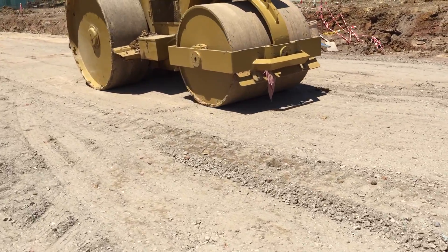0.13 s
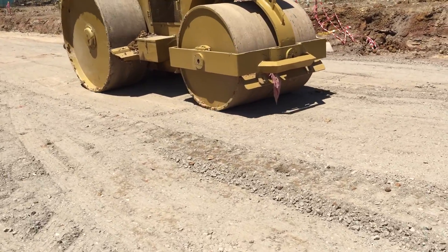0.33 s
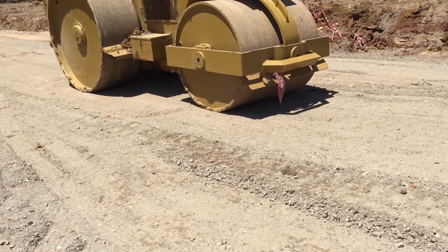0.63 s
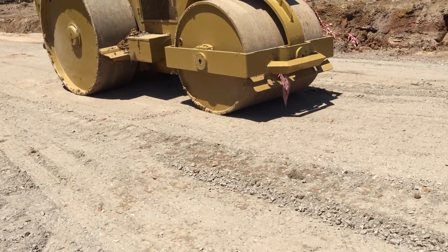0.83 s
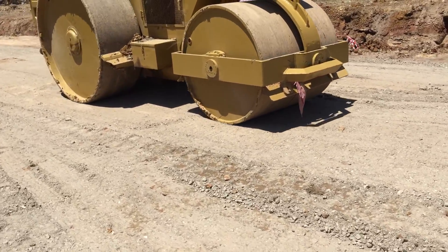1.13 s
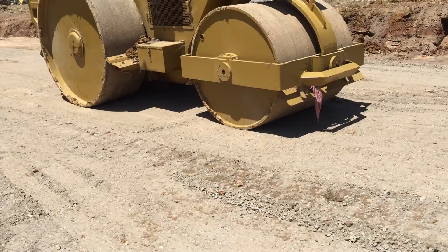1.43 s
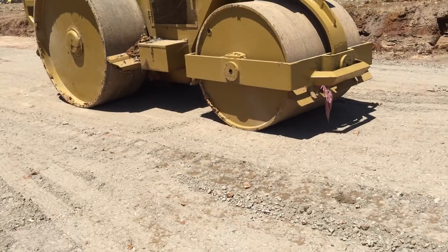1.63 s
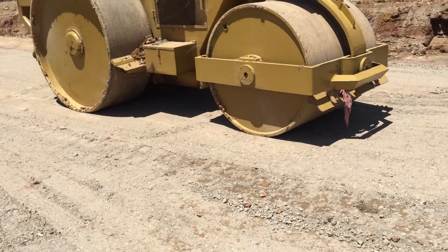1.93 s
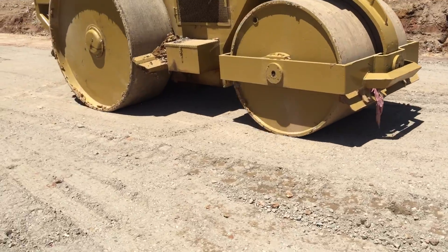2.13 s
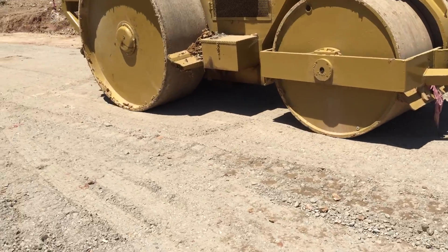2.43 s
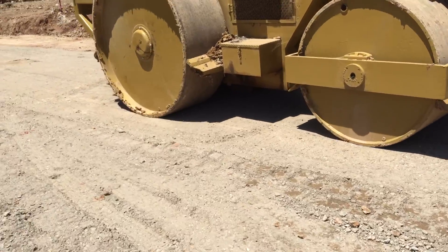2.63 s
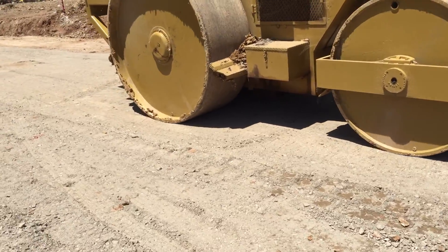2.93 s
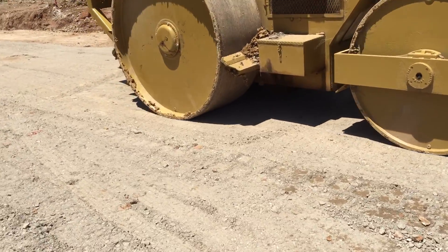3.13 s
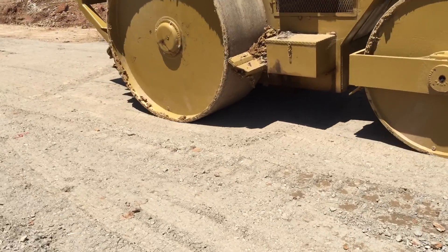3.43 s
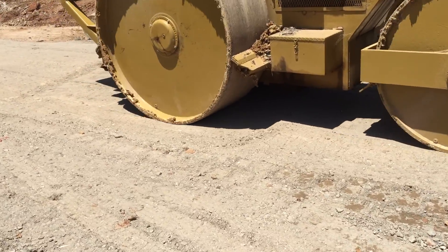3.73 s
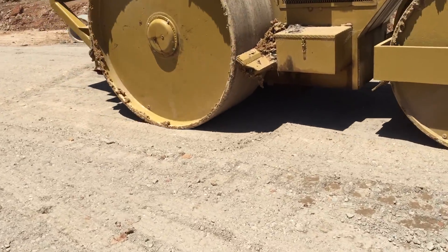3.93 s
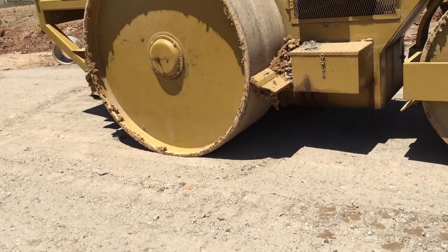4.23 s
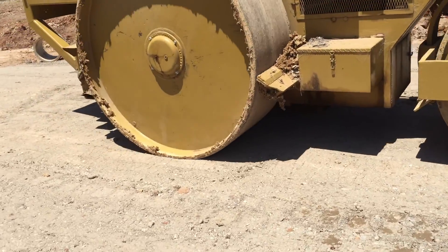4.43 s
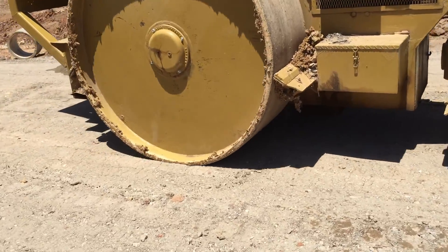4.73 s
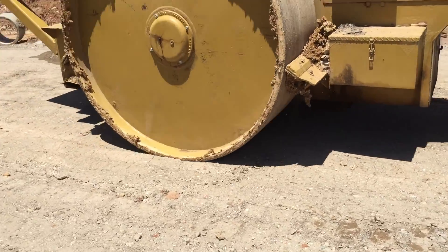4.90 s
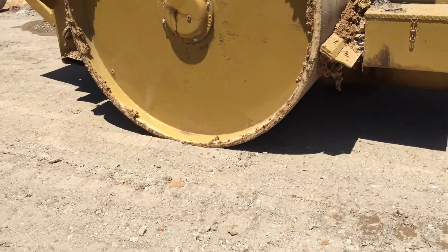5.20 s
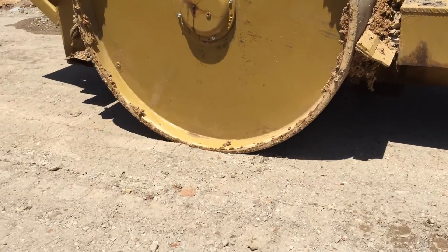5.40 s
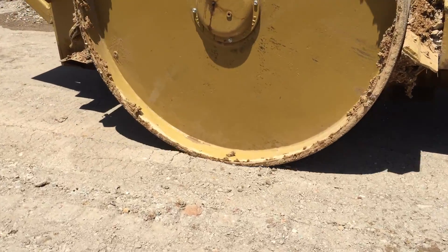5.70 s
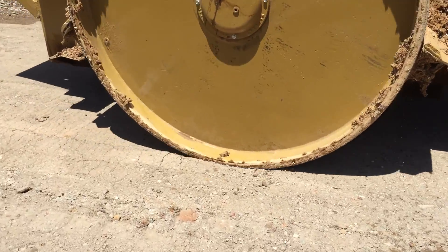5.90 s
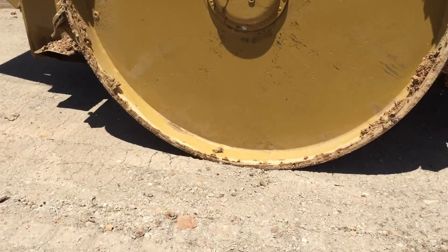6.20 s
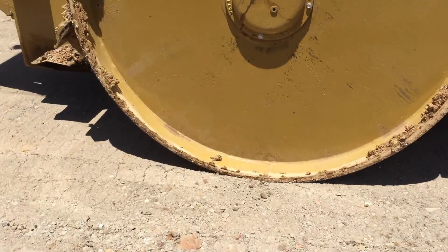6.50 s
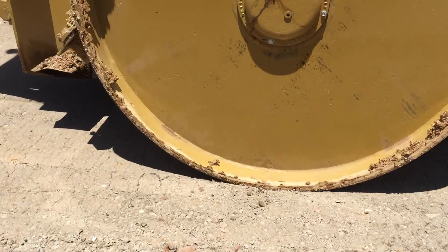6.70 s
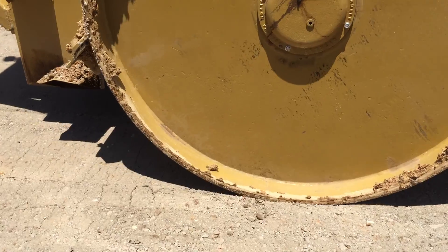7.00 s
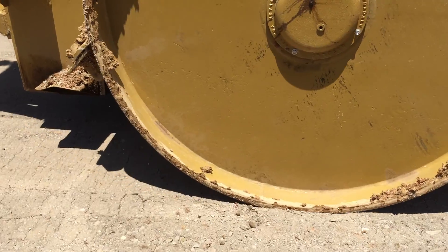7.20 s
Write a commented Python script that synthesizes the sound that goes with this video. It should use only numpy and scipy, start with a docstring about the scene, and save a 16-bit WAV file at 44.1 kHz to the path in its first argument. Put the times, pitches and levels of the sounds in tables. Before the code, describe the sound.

Outdoors on a construction site, a heavy diesel roller chugs at idle, its low rumble topped by a rattling rasp. The throttle opens and the knock turns hard for a moment before the engine steadies at a higher speed. A gear whine joins in, with fan noise behind it, and the sound swells as the roller draws within a couple of metres of the microphone.

```python
"""First comes the slow throb of a four-cylinder diesel: a road roller, about 6.5 m up the road.
At three seconds it is opened up, overshoots and settles, then rolls by about 2 m from the microphone.
Every firing throbs in the exhaust, booms in the hood and knocks in the block; the knock turns harsh
while the engine speeds up. Pump and gears whine on multiples of the firing rate, and behind
it all is the rush of the cooling fan."""
import sys
import numpy as np
from scipy.fft import rfft, irfft, next_fast_len
from scipy.io import wavfile
from scipy.ndimage import uniform_filter1d, map_coordinates

SR = 44100
rng = np.random.default_rng(int(sys.argv[2]) if len(sys.argv) > 2 else 0)


def master_out(mix):
    """Clip the mix to full scale and print it as 16-bit PCM to the path in sys.argv[1]."""
    frames = np.transpose(np.atleast_2d(mix))
    ceiling = np.clip(frames, -1, 1)
    pcm = np.round(ceiling * 32767).astype(np.int16)
    wavfile.write(sys.argv[1], SR, pcm)


N = 324135

# Level laws of exhaust harmonics 1 to 3: (idle level [dB], working level [dB],
# added by full fuel [dB], distance-loss factor [ratio], nearest the microphone at [s])
EXHAUST_LEVELS = [(-23, -17.5, 2.8, 0.22, 6.2), (-19.3, -26, 1, 0.66, 5.8), (-32, -32, 0, 1.12, 7.7)]

def exhaust(firing, throttle, burn):
    """The deep throb of the pipe; its two humps merge into one puff as the throttle opens."""
    first_db, second_db, third_db = [level(law, throttle, burn) for law in EXHAUST_LEVELS]
    lag_turns = 0.5 * (1 - throttle) - 0.06 * throttle
    first = amp(first_db + 0.1 * wobble(18)) * tone(firing)
    second = amp(second_db + 0.51 * wobble(25)) * tone(2 * firing - lag_turns)
    third = amp(third_db + 0.7 * wobble(15)) * tone(3 * firing - lag_turns)
    return first + second + third


# Knock of each cylinder, in firing order: (relative level [dB])
CYLINDER_KNOCK = [0.52, -0.75, 0.3, 0.13]
# The block's colour at idle and at working speed: (frequency [Hz], relative level [dB])
BLOCK_IDLE_SPECTRUM = [(250, -13), (420, -7.5), (560, -1), (680, 0), (820, -4), (1100, -1.5), (1300, -1.5),
                       (1480, -0.5), (1900, -4.5), (2150, -10), (2600, -11), (3400, -28), (6000, -48)]
BLOCK_WORK_SPECTRUM = [(250, -15), (420, -10), (600, -3), (760, 2), (880, -1.5), (1050, 1.5), (1280, -2),
                       (1600, 1.5), (1850, -1), (2100, -3.5), (2500, -5.5), (3400, -15.5), (6000, -41)]
# The block's level law, columns as for the exhaust
BLOCK_LAW = (-26, -26.5, 2.5, 0.92, 5.6)

def block_knock(firing, throttle, fuel):
    """Combustion knocks in the block, with a sharper attack at working speed."""
    idle_knocks = blows(firing, CYLINDER_KNOCK, lag=0.2, rise_s=0.006, decay_s=0.025,
                        repeat=0.43, scatter_db=0.86, jitter_s=5e-5)
    work_knocks = blows(firing, CYLINDER_KNOCK, lag=0.15, rise_s=0.0021, decay_s=0.032,
                        repeat=0.58, scatter_db=0.77, jitter_s=4e-5)
    idle = np.sqrt(1 - throttle) * coloured(idle_knocks, BLOCK_IDLE_SPECTRUM)
    work = np.sqrt(throttle) * coloured(work_knocks, BLOCK_WORK_SPECTRUM)
    return amp(level(BLOCK_LAW, throttle, fuel)) * (idle + work)


# Boom of each cylinder, in firing order: (relative level [dB])
CYLINDER_BOOM = [-0.4, 1.5, -0.99, 0.2]
# The hood's colour: (frequency [Hz], relative level [dB])
HOOD_SPECTRUM = [(8, -45), (25, -6), (60, 3), (130, -2.5), (160, -5), (195, 0.5), (270, -1.5), (330, -2.5),
                 (430, -6), (600, -21), (1000, -50)]
# The hood's level law, columns as for the exhaust
HOOD_LAW = (-33, -31.5, 7.5, 0.72, 6.1)

def hood_boom(firing, throttle, burn):
    """Each firing shakes a low thump out of the hood."""
    thumps = blows(firing, CYLINDER_BOOM, lag=0.2027, rise_s=0.002, decay_s=0.016,
                   repeat=0.44, scatter_db=1.5, jitter_s=1e-4)
    return amp(level(HOOD_LAW, throttle, burn)) * coloured(thumps, HOOD_SPECTRUM)


# Resonances of the steel covers: (frequency [Hz], width [Hz], relative level [dB])
COVER_MODES = [(1297, 55, 0.5), (1602, 133, -2.5), (1872, 70, -2.5), (1980, 66, -2.5), (2282, 62, -3),
               (2580, 98, -4.5), (3028, 48, -6.5), (3220, 60, -11), (3837, 36, -8.5), (4570, 41, -11.5),
               (6150, 250, -18.5)]
# The covers' level law, columns as for the exhaust
COVER_LAW = (-30.5, -31.5, 5, 1.1, 6.5)

def cover_ring(firing, throttle, fuel):
    """Each firing taps the steel covers and sets them ringing."""
    taps = blows(firing, CYLINDER_KNOCK, lag=0.1, rise_s=0.0011, decay_s=0.013,
                 repeat=0.36, scatter_db=2.5, jitter_s=4e-5)
    return amp(level(COVER_LAW, throttle, fuel)) * ringing(taps, COVER_MODES)


# The injectors' colour: (frequency [Hz], relative level [dB])
INJECTOR_SPECTRUM = [(1500, -18), (2500, 2), (3100, 1.5), (3900, 0.5), (4500, -1), (5000, -3), (5700, -1.5),
                     (6800, -2), (7700, -7.5), (9200, -7.5), (10500, -14), (11300, -12.5), (13000, -13),
                     (15400, -18.5)]
# The injectors' level law, columns as for the exhaust
INJECTOR_LAW = (-33.5, -33.5, 3, 1.13, 5.85)

def injector_rasp(firing, throttle, fuel):
    """One bright tick per firing runs together into a rasp."""
    ticks = blows(firing, CYLINDER_KNOCK, lag=0.06, rise_s=0.0036, decay_s=0.021,
                  repeat=0.43, scatter_db=0.7, jitter_s=3e-5)
    return amp(level(INJECTOR_LAW, throttle, fuel)) * coloured(ticks, INJECTOR_SPECTRUM)


# Colour of the knock under extra fuel: (frequency [Hz], relative level [dB])
HARSH_SPECTRUM = [(60, -30), (130, 0), (200, 19), (260, 20), (330, 13), (460, 14), (900, 6), (1300, 0),
                  (2000, 19), (2600, 5), (3400, 5), (5000, -3), (9000, -6), (12000, -8), (15400, -12)]
# The treble snap's level law, columns as for the exhaust
SNAP_LAW = (-50, -49, 6.5, 1.8, 3.5)

def combustion_crack(firing, throttle, fuel):
    """Extra fuel makes each knock harsh; the knock's sharp front carries a snap at the very top."""
    cracks = blows(firing, CYLINDER_KNOCK, lag=0.1, rise_s=0.0016, decay_s=0.0095,
                   repeat=0.23, scatter_db=4.0, jitter_s=1e-4)
    harsh = amp(-32.5) * np.maximum(fuel, 0) * coloured(cracks, HARSH_SPECTRUM)
    snap_spectrum = [(4000, -30), (8500, -4), (9700, 0), (10500, -11), (11800, -0.5), (15400, -9)]
    snap = amp(level(SNAP_LAW, throttle, fuel)) * coloured(cracks, snap_spectrum)
    return harsh + snap


# Lesser engine tones at idle and at working speed: (firing-rate multiple [ratio], relative level [dB])
IDLE_DRONE = [(1.75, -47), (2.75, -44), (4, -50.5), (4.5, -48.5), (5, -51), (6.25, -52), (12, -45),
              (13, -44), (14, -47.5), (14.5, -50.5), (14.75, -47), (15, -46.5), (24.75, -52), (28.25, -50),
              (40.5, -46)]
WORK_DRONE = [(1.75, -40.5), (3.75, -46), (4, -34.5), (4.25, -41.5), (4.5, -44), (4.75, -39.5), (5, -33),
              (5.25, -35.5), (6, -45.5), (6.25, -46.5), (8, -48), (8.25, -45), (13, -41.5), (14, -43),
              (14.5, -44), (23, -45), (24.25, -44.5)]

def drone(firing, tones, flutter_db, drift, spread):
    """Tones locked to the four-firing cycle; the low ones meet on the strongest cylinder and chug."""
    out = np.zeros(N)
    since_blow = firing - np.argmax(CYLINDER_BOOM) - 0.4
    for multiple, db in tones:
        turns = multiple * (since_blow + drift * wobble(14) + spread * rng.standard_normal())
        out += amp(db + flutter_db * wobble(12)) * tone(turns)
    return out


# Pump and gear whines: (firing-rate multiple [ratio, played to the nearest half], idle level [dB],
# working level [dB], beam on the microphone at [s], beam half-width [s], beam level [dB],
# swell per engine cycle [0-1])
GEAR_WHINES = [(9, -43.5, -47, 3.58, 1, -39.5, .1), (11, -58, -42, 4.02, 0.5, -39, .1),
               (13.5, -50, -45, 3.85, 0.85, -35, .1), (18, -48, -43.5, 4.2, 0.63, -34.3, .1),
               (21, -60, -50, 6.2, 0.74, -38, .1), (22.5, -49, -46, 5.27, 0.43, -38.5, .2),
               (27, -52, -44, 4.77, 0.4, -43, .1), (28, -41.5, -37.5, 4.5, 0.75, -31, .4),
               (42.06, -55, -52, 5.5, 0.45, -42.5, .1)]

def gear_whine(firing, throttle, flutter_db, backlash, surge):
    """Meshing teeth whine, throb with the torque and swell as their beams sweep past the microphone."""
    out = np.zeros(N)
    t = np.arange(N) / SR
    for multiple, idle_db, work_db, centre_s, width_s, beam_db, lope in GEAR_WHINES:
        beam = amp(beam_db) * np.exp(-((t - centre_s) / width_s) ** 2)
        gain = (1 - throttle) * amp(idle_db) + throttle * np.hypot(amp(work_db), beam)
        shaft = firing + backlash * (wobble(60) + wobble(8))
        angle = 2 * np.pi * (firing + rng.random())
        torque = 1 + surge * np.cos(angle) + lope * np.cos(angle / len(CYLINDER_KNOCK))
        flutter = amp(flutter_db * wobble(25))
        mesh = tone(np.round(2 * multiple) / 2 * shaft + rng.random())
        out += gain * flutter * torque * mesh
    return out


# The fan's colour: (frequency [Hz], relative level [dB])
FAN_SPECTRUM = [(25, 4), (100, 6.5), (200, 2), (450, 2.5), (900, -1), (1500, -6.5), (2500, -5),
                (4000, -13.5), (8000, -24), (15000, -24)]

def cooling_fan(distance_db):
    """A rush of air behind the engine, growing as the roller nears."""
    return amp(-34.0 + 0.59 * distance_db) * coloured(rng.standard_normal(N), FAN_SPECTRUM)


def governor(firing_hz, lead_s=0.035, full_fuel_hz_per_s=28):
    """Extra fuel, -1 to 1: given just before the flywheel gains speed, cut when it overshoots."""
    acceleration = np.gradient(uniform_filter1d(firing_hz, SR // 8)) * SR
    return np.clip(delayed(acceleration, -lead_s) / full_fuel_hz_per_s, -1, 1)


def passing(nearest_s, closest_m=2.15, speed_m_per_s=1.0):
    """Distance loss of a part rolling past the microphone: 0 dB when nearest, negative elsewhere."""
    along_m = speed_m_per_s * (np.arange(N) / SR - nearest_s)
    return 20 * np.log10(closest_m / np.hypot(closest_m, along_m))


def level(law, throttle, fuel):
    """A part's dB at the microphone: set by engine speed, raised by fuel, lowered by distance."""
    idle_db, work_db, fuel_db, falloff, nearest_s = law
    return idle_db + (work_db - idle_db) * throttle + fuel_db * fuel + falloff * passing(nearest_s)


def blows(firing, cylinder_db, lag, rise_s, decay_s, repeat, scatter_db, jitter_s):
    """One burst per firing, lag firings late; repeat is the power share of its cylinder's own ring."""
    beats = np.arange(np.floor(firing[-1]))
    cylinder = beats.astype(int) % len(cylinder_db)
    t = np.arange(SR // 16) / SR
    rings = rng.standard_normal((len(cylinder_db), len(t)))
    chance = rng.standard_normal((len(beats), len(t) + 2))
    strength, timing, fresh_noise = chance[:, 0], chance[:, 1], chance[:, 2:]
    bursts = np.sqrt(repeat) * rings[cylinder] + np.sqrt(1 - repeat) * fresh_noise
    bursts *= (1 - np.exp(-t / rise_s)) * np.exp(-t / decay_s)
    bursts *= amp(np.asarray(cylinder_db)[cylinder] + scatter_db * strength)[:, None]
    starts = np.interp(beats + lag, firing, np.arange(N)) + jitter_s * SR * timing
    samples = np.abs(starts).astype(int)[:, None] + np.arange(len(t))
    return np.bincount(samples.ravel(), bursts.ravel(), N)[:N]


def ringing(x, modes):
    """x through resonances of alternating sign, at rms 1."""
    def response(hz):
        return sum((-1) ** k * amp(db) * 1j * hz * width / (centre ** 2 - hz ** 2 + 1j * hz * width)
                   for k, (centre, width, db) in enumerate(modes))
    return unit(filtered(x, response))


def coloured(x, spectrum):
    """x shaped by (frequency [Hz], level [dB]) points, at rms 1."""
    points_hz, db = np.transpose(spectrum)
    return unit(filtered(x, lambda hz: amp(np.interp(np.log(hz + 1), np.log(points_hz), db))))


def filtered(x, response):
    """x through a frequency response."""
    size = next_fast_len(N + SR // 2)
    return irfft(rfft(x, size) * response(np.fft.rfftfreq(size, 1 / SR)), size)[:N]


def wobble(rate):
    """A smooth random curve, rate knots a second."""
    steps = np.linspace(0, N, N // 64)
    knots = rng.standard_normal(int(N * rate / SR) + 4)
    return np.interp(np.arange(N), steps, map_coordinates(knots, [steps * rate / SR]))


def delayed(x, seconds):
    """A control curve shifted later in time, or earlier if seconds is negative."""
    return np.interp(np.arange(N) - seconds * SR, np.arange(N), x)


def tone(turns):
    """A sine of rms 1."""
    return np.sqrt(2) * np.cos(2 * np.pi * turns)


def amp(db):
    """Decibels to gain."""
    return 10 ** (np.asarray(db) / 20)


def unit(x):
    """Scale to rms 1."""
    return x / np.sqrt(np.mean(x ** 2) + 1e-20)


# Engine speed, held by the governor but for one step up with an overshoot: (time [s], firing rate [Hz])
ENGINE_SPEED = [(0, 46.17), (2.95, 46.17), (3.0, 47.5), (3.2, 54.6), (3.3, 56.2), (3.43, 53.5),
                (3.6, 54.55), (4.2, 54.3), (7.35, 54.62)]

def scene():
    """The roller from one spot at the roadside, in mono: speed, fuel and distance shape the mix."""
    firing_hz = np.interp(np.arange(N) / SR, *np.transpose(ENGINE_SPEED))
    firing = np.cumsum(firing_hz) / SR  # running count of firings
    throttle = np.clip((firing_hz - 47) / 6, 0, 1)  # 0 at idle, 1 at working speed
    fuel = governor(firing_hz)
    burn = delayed(fuel, seconds=0.045)  # exhaust and hood answer the fuel after the knock does
    distance_db = passing(nearest_s=6.2)
    idle_gain = (1 - throttle) * amp(2.5 + 0.32 * distance_db)
    work_gain = throttle * amp(-0.3 + 1.2 * distance_db + 4.6 * burn)
    idle = idle_gain * drone(firing, IDLE_DRONE, flutter_db=1.8, drift=0.0029, spread=0.06)
    work = work_gain * drone(firing, WORK_DRONE, flutter_db=1.0, drift=0.0014, spread=0.035)
    whine = gear_whine(firing, throttle, flutter_db=1.0, backlash=0.0013, surge=0.28)
    whine *= amp(-2.5 * np.abs(fuel))  # the teeth sing best under a steady load
    fan = cooling_fan(distance_db)
    throb = exhaust(firing, throttle, burn) + hood_boom(firing, throttle, burn)
    clatter = block_knock(firing, throttle, fuel) + cover_ring(firing, throttle, fuel)
    rasp = injector_rasp(firing, throttle, fuel) + combustion_crack(firing, throttle, fuel)
    return (throb + clatter + rasp + idle + work + whine + fan)[None]


def record(dry):
    """The microphone channel passes nothing above its band limit."""
    top_hz = 15450
    return filtered(dry[0], lambda hz: hz < top_hz)[None]


dry = scene()
out = record(dry)
master_out(out)
```